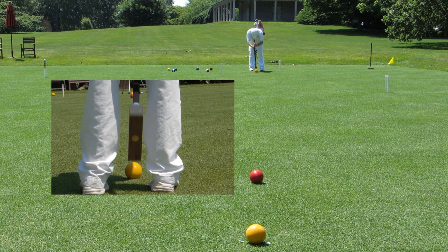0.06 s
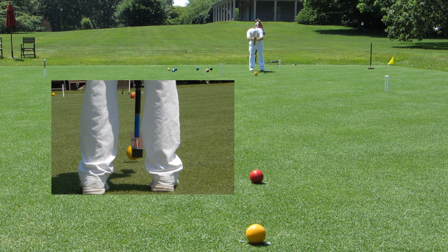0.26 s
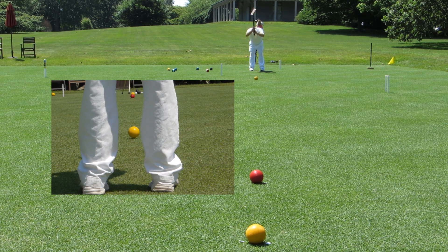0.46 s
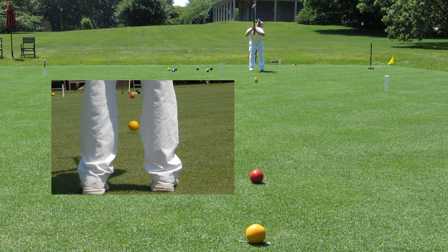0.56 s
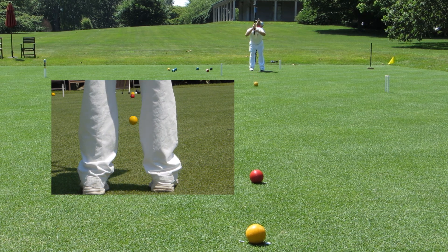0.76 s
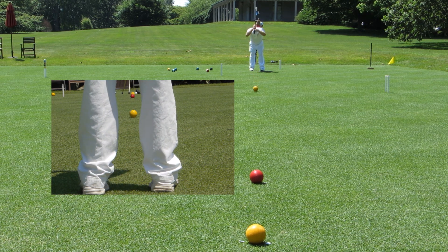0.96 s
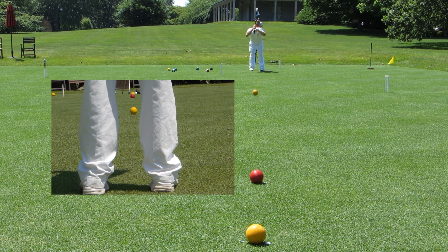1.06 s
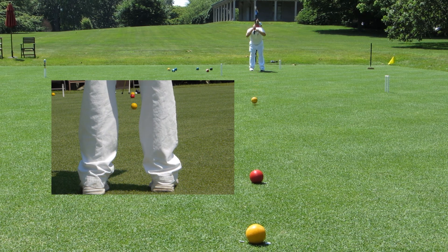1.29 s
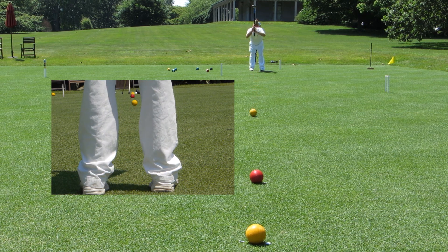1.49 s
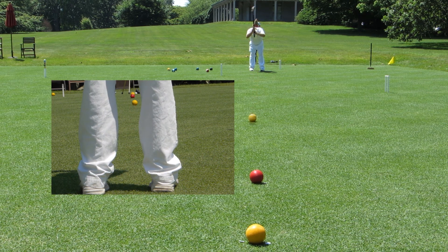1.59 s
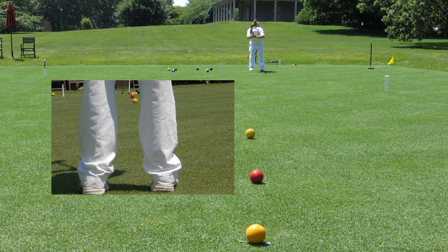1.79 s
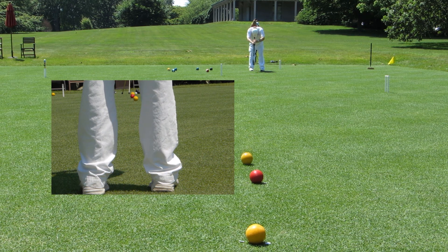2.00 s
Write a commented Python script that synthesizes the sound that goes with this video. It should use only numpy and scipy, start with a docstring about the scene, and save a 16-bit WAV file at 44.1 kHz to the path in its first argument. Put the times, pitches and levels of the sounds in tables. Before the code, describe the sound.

After a moment of outdoor hiss, one hard woody clack of mallet on ball, close and clipped, followed by quick scattered reflections and a faint distant echo, fading into rumbling open air and a thin camera whine.

```python
"""A wooden mallet strikes a croquet ball on an open lawn: one hard, very short crack that just overloads the camera.
The blow is a filtered pulse, a sum of decaying wood modes and a short burst of noise from close scatter.
Trees return a bright wash of decaying noise; a few dull echoes, each a tone plus noise, stand apart, the last far.
Under it lie outdoor air with a low rumble, made of coloured noise, and the camera's thin whine, two sines."""
import sys
import numpy as np
from scipy import signal
from scipy.fft import rfft, irfft, next_fast_len
from scipy.io import wavfile

SR = 44100
rng = np.random.default_rng(int(sys.argv[2]) if len(sys.argv) > 2 else 0)


def waveform_to_disk(signal):
    """Save audio, clipped to [-1, 1], as 16-bit WAV at the path in sys.argv[1]."""
    frames = np.transpose(np.atleast_2d(signal))
    scaled = np.clip(frames, -1, 1) * 32767
    samples = np.round(scaled).astype(np.int16)
    wavfile.write(sys.argv[1], SR, samples)


N = 90404
TIME = np.arange(N) / SR
SIDES = np.array([[1], [-1]])  # left, right


def undb(db):
    """Decibels to amplitude gain."""
    return 10 ** (np.asarray(db) / 20)


def curve(points, size):
    """Interpolate (Hz, value) points on a log-frequency axis at the bins of a transform."""
    hz, value = np.array(points, float).T
    bins_hz = np.fft.rfftfreq(size, 1 / SR)
    return np.interp(np.log(bins_hz + 1), np.log(hz), value)


def colour(x, points, power=1):
    """Minimum-phase filter through (Hz, dB) points, its dB multiplied by power."""
    size = 2 * next_fast_len(N)
    cepstrum = irfft(power * np.log(undb(curve(points, size))))
    # folding the cepstrum makes the filter causal
    cepstrum[1:size // 2] *= 2
    cepstrum[size // 2 + 1:] = 0
    response = np.exp(rfft(cepstrum))
    return irfft(rfft(x, size) * response)[..., :N]


def ports(left, right, balance):
    """Two microphone ports that differ in colour: 0.37 of the balance dB on the left, -0.57 on the right."""
    return np.array([colour(left, balance, 0.37), colour(right, balance, -0.57)])


def noise(points, channels=1):
    """Coloured noise of rms 1 over all channels."""
    x = colour(rng.standard_normal((channels, N)), points)
    return x / x.std()


def peak(x, db):
    """Scale to a peak level."""
    return x * undb(db) / np.abs(x).max()


def fade(age_s, t60_s):
    """Exponential decay from age zero, 60 dB in t60."""
    return np.exp(-np.log(1000) * np.maximum(age_s, 0) / t60_s)


def walk(rate_hz):
    """Random normal values drawn at a fixed rate and joined by straight lines."""
    return np.interp(TIME * rate_hz, np.arange(1024), rng.standard_normal(1024))


# Fundamental, then octave. Each row: left level in dB rms, right level in dB rms.
WHINE_LEVELS = [(-57, -67), (-66, -67)]
WHINE_HZ = 7867


def whine():
    """A steady high tone and its octave from the camera's electronics."""
    out = 0
    for harmonic, levels_db in enumerate(WHINE_LEVELS, 1):
        amplitude = np.sqrt(2) * undb(levels_db)[:, None]
        out = out + amplitude * np.sin(2 * np.pi * harmonic * WHINE_HZ * TIME)
    return out


# Air spectrum. Each row: frequency in Hz, relative density in dB per Hz.
AIR_SPECTRUM = [(15, -12), (28, -8), (45, 2.5), (80, 1), (150, 1.5), (220, -2.5), (300, -2.5), (400, -8),
                (520, -9.5), (750, -6), (1100, -7), (2000, -13), (4000, -21), (8000, -26.5), (12000, -32.5),
                (15500, -37)]
# Port balance, scaled in ports(). Each row: frequency in Hz, left minus right in dB.
AIR_BALANCE = [(20, -6), (60, 10.5), (130, 14.5), (250, 10), (400, 3), (900, 3), (2000, 1.2), (15000, 0)]
# Opposite-phase part of the air at the two ports. Each row: frequency in Hz, share of power from 0 to 1.
AIR_OPPOSED_SHARE = [(30, 0.67), (200, 0.79), (800, 0.51), (2000, 0.49), (5000, 0.53), (12000, 0.41)]
# Slight swell of the air. Each row: time in seconds, gain in dB.
AIR_SWELL = [(0, -.5), (.3, -0.7), (.6, -0.5), (1.0, -0.5), (1.5, -0.5), (2.05, 0)]
AIR_BASE_DB, AIR_WAVER_DB, AIR_WAVER_HZ = -40.5, 0.09, 6.4  # base before swell and port balance


def air():
    """Nearly steady wide hiss of open air, its low rumble mostly stronger on the left."""
    common, *own = rfft(noise(AIR_SPECTRUM, channels=3))
    share = curve(AIR_OPPOSED_SHARE, N)
    opposed = np.sqrt(share) * common * SIDES
    separate = np.sqrt(1 - share) * np.array(own)
    left, right = irfft(opposed + separate, N)
    swell_db = np.interp(TIME, *np.array(AIR_SWELL).T)
    level_db = AIR_BASE_DB + swell_db + AIR_WAVER_DB * walk(AIR_WAVER_HZ)
    return ports(left, right, AIR_BALANCE) * undb(level_db)


# Wash spectrum. Each row: frequency in Hz, relative density in dB per Hz.
TREES_SPECTRUM = [(200, -19.5), (450, -15), (750, 2), (1200, 3.5), (1600, 2.5), (2400, -3), (2900, -4),
                  (3500, 4), (4400, -2.5), (5000, -8.5), (5700, -4.5), (7000, -9), (10000, -15),
                  (15000, -31)]
TREES_BASE_DB, TREES_PAN_DB = -36, 3.5  # gain of the unit-rms wash; left minus right
TREES_START_S, TREES_RISE_S, TREES_HOLD_S = 0.2458, 0.049, 0.0079
TREES_T60_S, TREES_LATE_T60_S, TREES_LATE_DB = 0.29, 1.0, -6.5  # late level relative to the early part
TREES_TREBLE_HZ = 6900  # the late part is dulled above this
TREES_COMMON_SHARE, TREES_LEFT_LAG_S = 0.51, 0.00005  # power shared by the ports; its lag on the left


def trees():
    """Countless small returns from the foliage swell, hold and die away, the treble first."""
    common, left, right = noise(TREES_SPECTRUM, channels=3)
    lagged = np.interp(TIME - TREES_LEFT_LAG_S, TIME, common)
    shared = np.sqrt(TREES_COMMON_SHARE) * np.array([lagged, common])
    wash = shared + np.sqrt(1 - TREES_COMMON_SHARE) * np.array([left, right])
    lowpass = signal.butter(2, TREES_TREBLE_HZ, fs=SR, output="sos")
    body = signal.sosfiltfilt(lowpass, wash)
    age_s = TIME - TREES_START_S
    past_s = age_s - TREES_RISE_S - TREES_HOLD_S
    early = wash * fade(past_s, TREES_T60_S)
    late = body * undb(TREES_LATE_DB) * fade(past_s, TREES_LATE_T60_S)
    rise = np.clip(age_s / TREES_RISE_S, 0, 1)
    return rise * (early + late) * undb(TREES_BASE_DB + SIDES * TREES_PAN_DB / 2)


# Separate echoes. Each row: start in seconds, envelope peak in dB before pan and part gains, centre in Hz,
# width in Hz, rise in seconds, left minus right in dB.
ECHO_RETURNS = [(.2503, -28, 685, 300, 0.0023, 9), (.254, -39, 920, 900, .001, 7),
                (0.2635, -28.5, 1300, 2500, 0.00044, -6), (0.6844, -32.5, 810, 450, 0.0033, 9)]
ECHO_TONE_DB, ECHO_BLUR_DB = -4.5, -8  # clear and smeared parts, relative to the envelope


def echoes():
    """Single returns of the blow, dulled and smeared by the way: a tone and noise in one short envelope."""
    out = 0
    for start_s, peak_db, hz, width_hz, rise_s, pan_db in ECHO_RETURNS:
        age_s = np.maximum(TIME - start_s, 0)
        envelope = (age_s / rise_s) ** 2 * np.exp(-2 * age_s / rise_s)  # highest at rise_s
        tone = np.sin(2 * np.pi * hz * age_s)
        edge_hz = hz + width_hz
        blur = noise([(hz / 4, -25), (hz, 0), (edge_hz, -6), (2 * edge_hz, -25), (4 * edge_hz, -60)])[0]
        mix = undb(ECHO_TONE_DB) * tone + undb(ECHO_BLUR_DB) * blur
        out = out + peak(envelope, peak_db) * mix * undb(SIDES * pan_db / 2)
    return out


# Contact pulse spectrum. Each row: frequency in Hz, relative level in dB.
CRACK_SPECTRUM = [(20, -64), (80, -48), (170, -21), (300, -9), (500, -1), (800, 2), (1250, -5), (1600, -7),
                  (2500, -12), (3600, -11), (5500, -18.5), (10000, -29), (12500, -36), (16000, -57)]
# Modes of mallet and ball. Each row: frequency in Hz, relative level in dB, t60 in seconds.
WOOD_MODES = [(318, -14.5, 0.069), (830, -35, 0.02), (1288, 5.5, 0.019), (1600, -12.5, 0.041),
              (1810, -2.5, 0.017), (2147, -13, 0.048), (2640, -4, 0.012), (3440, 0, 0.017),
              (3700, -8, .018), (4280, -10, 0.026), (5460, -16, 0.031), (6900, -16, 0.024),
              (7850, -12, 0.023), (9860, -13, 0.014)]
# Close scatter spectrum. Each row: frequency in Hz, relative density in dB per Hz.
RASP_SPECTRUM = [(150, -24), (500, -17), (1200, 6.5), (3500, 1), (6000, -12.5), (10000, -11), (16000, -36)]
# Port balance of the blow, scaled in ports(). Each row: frequency in Hz, left minus right in dB.
STRIKE_BALANCE = [(100, 18), (250, 27.5), (500, 11.5), (1000, 6.5), (2000, 4), (3500, 3.5), (5200, 1),
                  (7500, 8), (15000, 7)]
STRIKE_S = 0.2077
CRACK_PEAK_DB, RING_PEAK_DB, RASP_RMS_DB = 2, -12.5, -20.5  # before port balance; rasp before its envelope
RING_RISE_S = 0.0005
RASP_DELAY_S, RASP_RISE_S, RASP_T60_S = 0.00052, 0.0016, 0.015


def crack(strike_sample):
    """The contact pulse: an impulse shaped by the spectrum of the hit."""
    push = np.zeros(N)
    push[strike_sample] = -1
    return peak(colour(push, CRACK_SPECTRUM), CRACK_PEAK_DB)


def ring(age_s):
    """Brief ring of the wood: decaying sine modes with a soft onset."""
    modes = 0
    for hz, level_db, t60_s in WOOD_MODES:
        modes = modes - undb(level_db) * np.sin(2 * np.pi * hz * age_s) * fade(age_s, t60_s)
    onset = 1 - np.exp(-age_s / RING_RISE_S)
    return peak(modes * onset, RING_PEAK_DB)


def rasp(age_s):
    """Scatter close to the player: a short burst of noise just after contact."""
    late_s = age_s - RASP_DELAY_S
    rise = np.clip(late_s / RASP_RISE_S, 0, 1)
    envelope = rise * fade(late_s - RASP_RISE_S, RASP_T60_S)
    return undb(RASP_RMS_DB) * noise(RASP_SPECTRUM)[0] * envelope


def strike():
    """Mallet on ball: crack, ring and rasp, heard with more bass at the left port."""
    strike_sample = int(STRIKE_S * SR)
    age_s = np.maximum(TIME - strike_sample / SR, 0)
    blow = crack(strike_sample) + ring(age_s) + rasp(age_s)
    return ports(blow, blow, STRIKE_BALANCE)


def scene():
    """The background, the returns and the blow."""
    return whine() + air() + trees() + echoes() + strike()


DUCK_THRESHOLD_DB, DUCK_SHARE = -14, 0.27  # gain cut per dB above threshold
DUCK_ATTACK_S, DUCK_RELEASE_DB_PER_S = 0.006, 52
TOP_HZ = 15900


def record(dry):
    """Overload at full scale, gain control that ducks after loud peaks, and a steep treble cut."""
    x = np.clip(dry, -1, 1)
    level_db = 20 * np.log10(np.abs(x).max(axis=0) + np.finfo(float).eps)
    # peak hold that falls at the release rate
    sag_db = DUCK_RELEASE_DB_PER_S * TIME
    held_db = np.maximum.accumulate(level_db + sag_db) - sag_db
    target_db = DUCK_SHARE * np.maximum(held_db - DUCK_THRESHOLD_DB, 0)
    pole = np.exp(-1 / (DUCK_ATTACK_S * SR))
    duck_db = signal.lfilter([1 - pole], [1, -pole], target_db)
    top = signal.ellip(10, 0.1, 70, TOP_HZ, fs=SR, output="sos")
    return signal.sosfilt(top, x * undb(-duck_db))


dry = scene()
out = record(dry)
waveform_to_disk(out)
```